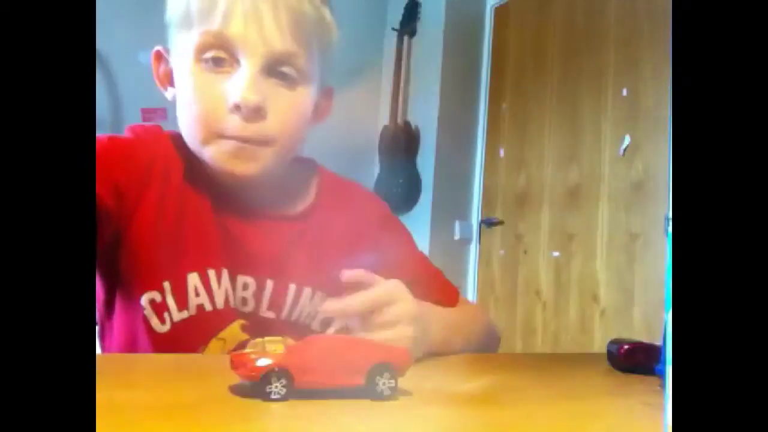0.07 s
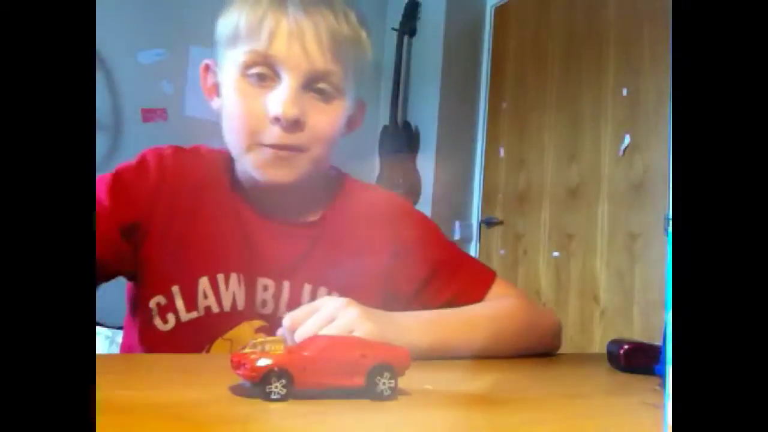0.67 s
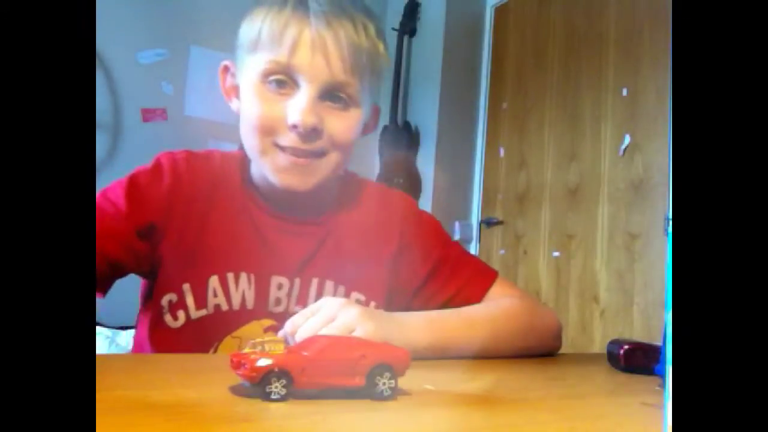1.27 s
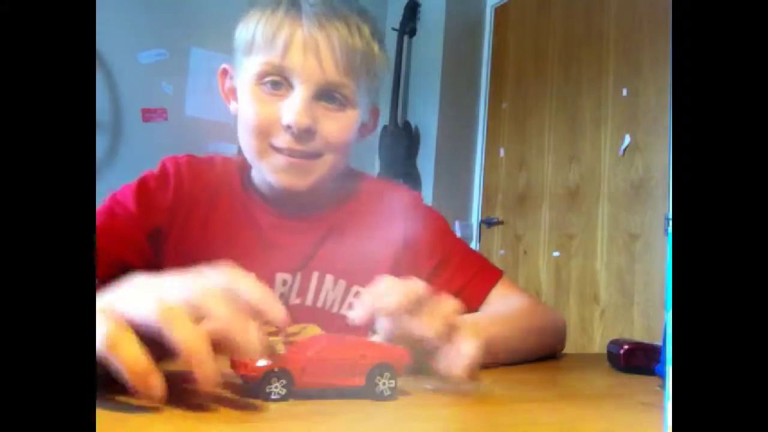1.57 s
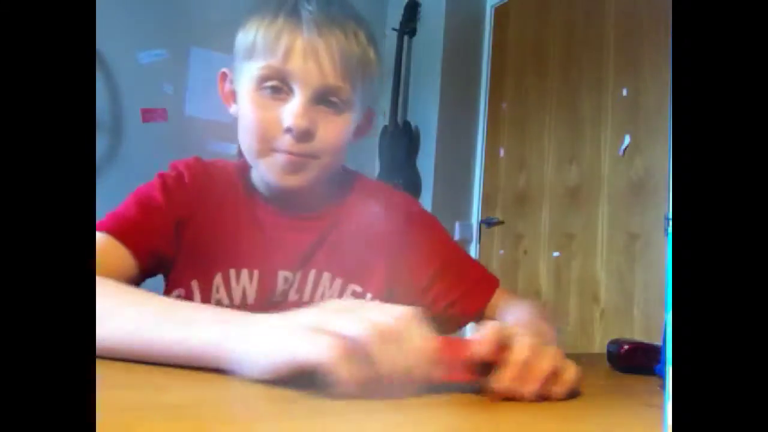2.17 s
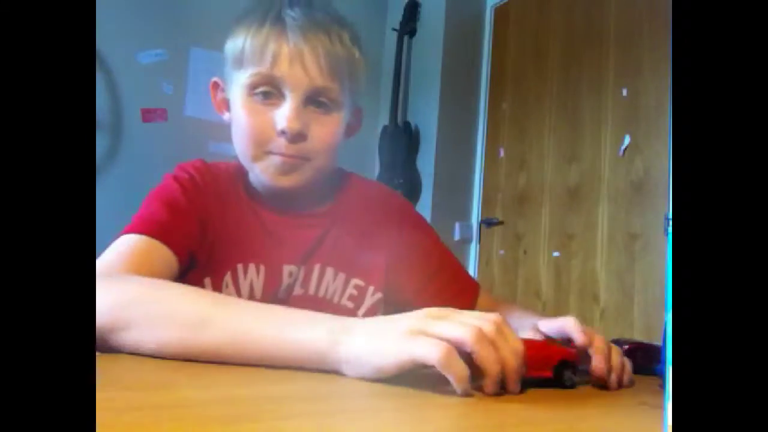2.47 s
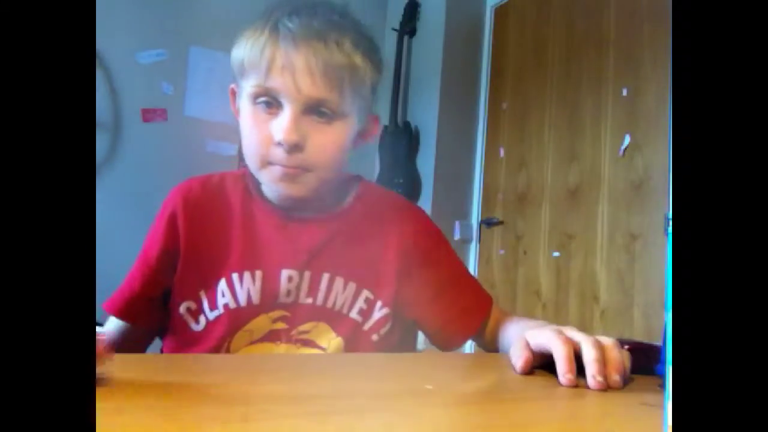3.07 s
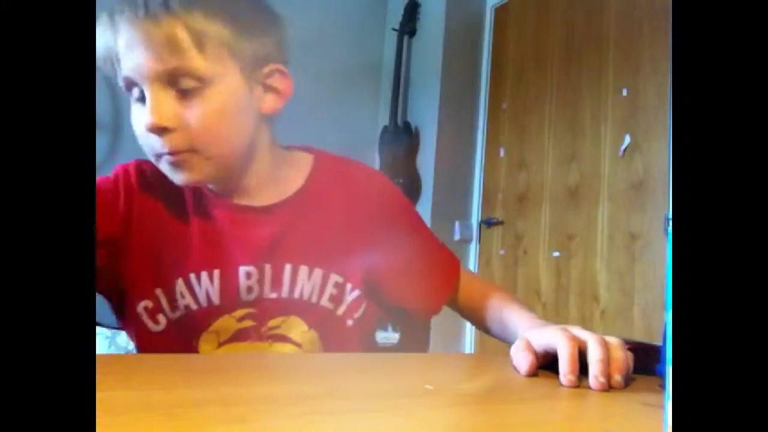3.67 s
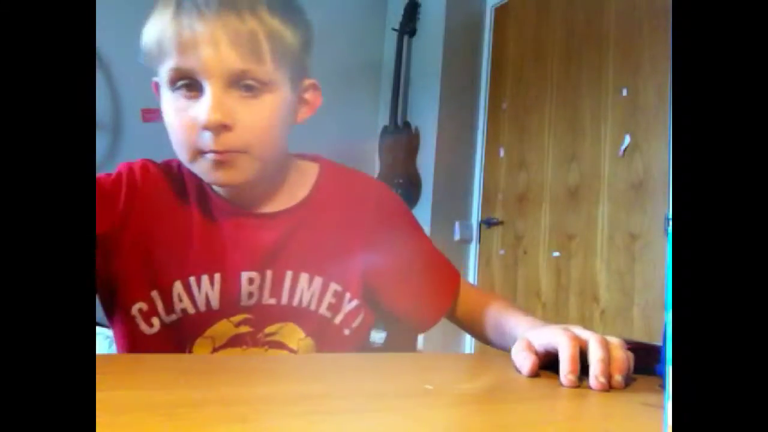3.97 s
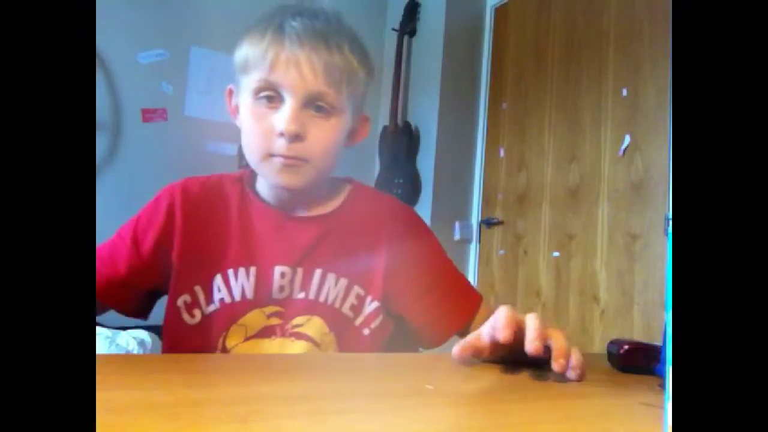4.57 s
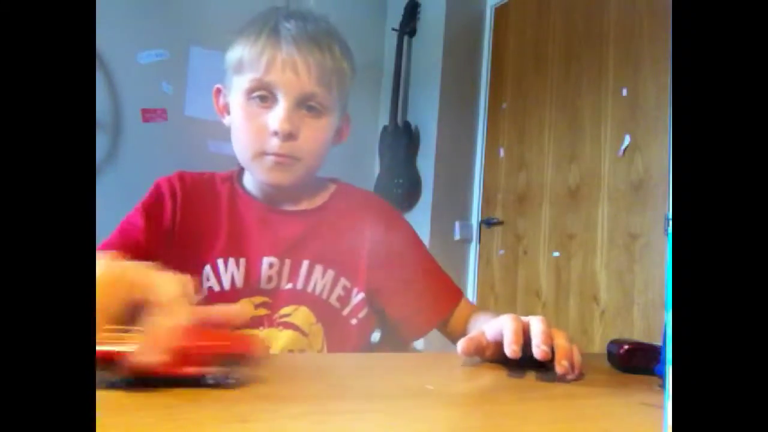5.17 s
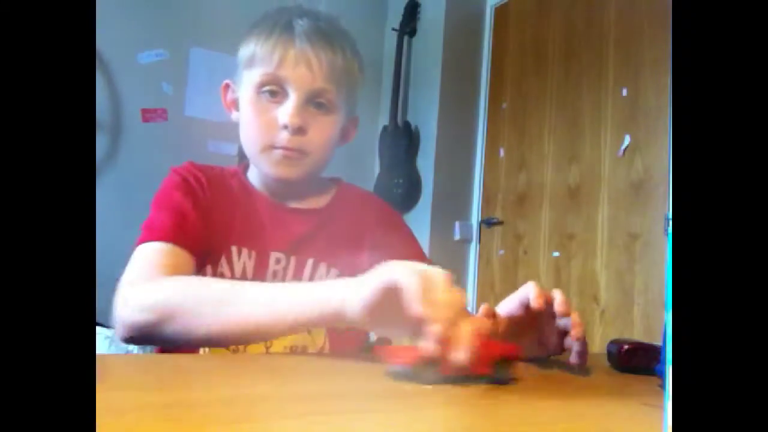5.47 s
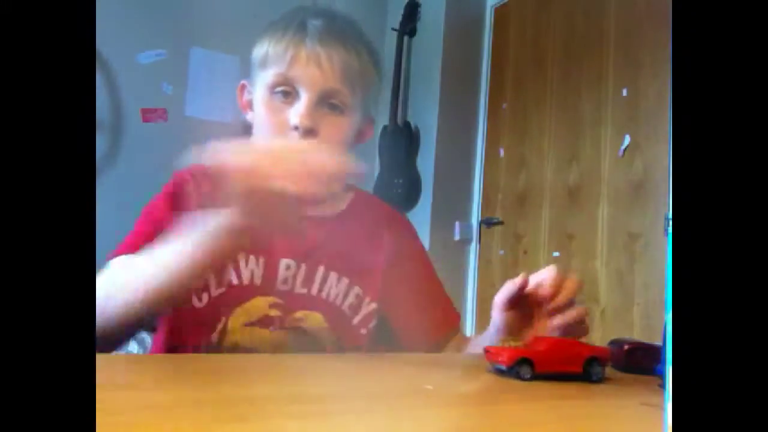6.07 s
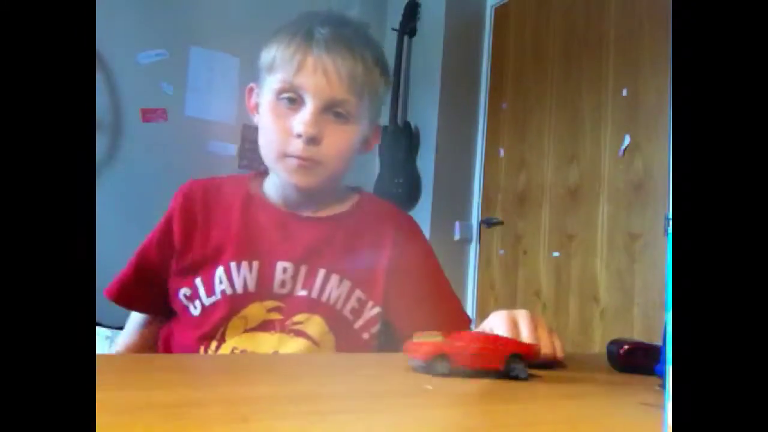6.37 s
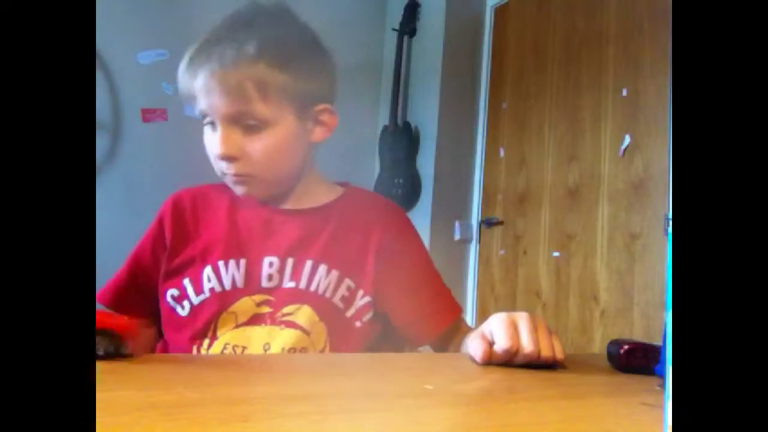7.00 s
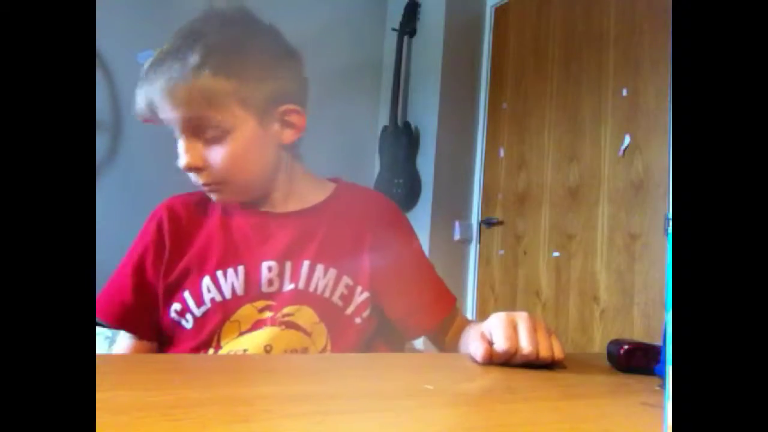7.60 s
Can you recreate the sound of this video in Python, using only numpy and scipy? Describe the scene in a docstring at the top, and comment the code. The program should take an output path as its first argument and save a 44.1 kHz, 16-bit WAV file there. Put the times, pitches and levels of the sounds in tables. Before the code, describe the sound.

A plastic pull-back toy car rattles over a wooden table, ratchets as it is wound, then rolls off and crashes to the floor.

```python
"""A small room with a wooden table, where a plastic pull-back toy car is pushed, wound back and let go.
Each contact is an impulse that excites damped modes: the wheels chatter, ringing the hollow shell and
the board, while hands rub and bump, gears whirr and the clutch of the fully wound spring ratchets.
On the last run the car shoots over the edge, hits the floor and bounces once."""
import sys
import numpy as np
from scipy import signal
from scipy.fft import rfft, irfft
from scipy.io import wavfile
from scipy.ndimage import uniform_filter1d

SR = 44100
rng = np.random.default_rng(int(sys.argv[2]) if len(sys.argv) > 2 else 0)


def pcm_store(signal):
    """Save signal as 16-bit PCM."""
    levels = np.round(np.clip(np.atleast_2d(signal), -1, 1) * 32767)
    wavfile.write(sys.argv[1], SR, levels.astype(np.int16).T)


N = 345744


def undb(db):
    """Logarithmic level: 20 dB is a factor of ten in amplitude."""
    return 10 ** (np.asarray(db) / 20)


def unit(x):
    """Normalisation to unit energy."""
    return x / np.sqrt(np.sum(x ** 2))


def convolve(x, response):
    """Convolution: a linear system answers every sample of x with its impulse response."""
    return signal.fftconvolve(x, response)[:N]


def colour(spectrum, size=4096):
    """Minimum phase: folding the cepstrum gives a causal response to a (f/Hz, level/dB) spectrum."""
    hz, db = np.transpose(spectrum)
    grid = np.maximum(np.fft.rfftfreq(size, 1 / SR), 1)
    magnitude = undb(np.interp(np.log(grid), np.log(hz), db))
    cepstrum = irfft(np.log(magnitude))
    cepstrum[1:size // 2] *= 2
    cepstrum[size // 2 + 1:] = 0
    return unit(irfft(np.exp(rfft(cepstrum))))


def noise(spectrum):
    """Spectral shaping: white noise takes on the given spectrum at unit power."""
    return convolve(rng.standard_normal(N), colour(spectrum))


def band(x, hz, width_hz):
    """Band-pass filtering: the part of x around hz, at unit power."""
    edges = [max(hz - width_hz / 2, 50), hz + width_hz / 2]
    sos = signal.butter(1, edges, "band", fs=SR, output="sos")
    passed = signal.sosfilt(sos, signal.sosfilt(sos, x))
    return passed / np.std(passed)


def drift(rate):
    """Random modulation: a glide between Gaussian values, rate of them a second."""
    step = int(SR / rate)
    held = np.repeat(rng.standard_normal(N // step + 1), step)
    return uniform_filter1d(held, step)[:N]


def swells(strokes):
    """Gaussian envelopes: each stroke rises and falls like a bell."""
    t = np.arange(N) / SR
    return sum(undb(db) * np.exp(-(2 * (t - middle) / length) ** 2) for middle, length, db in strokes)


def pulses(times, sizes):
    """Impulsive excitation: one sample for each contact."""
    return np.bincount(np.clip(times * SR, 0, N - 1).astype(int), sizes, N)


def fade(t60):
    """Exponential decay by 60 dB in t60 seconds, kept for half a second."""
    return np.exp(-np.log(1000) * np.arange(SR // 2) / SR / t60)


def ring(hz, t60, rise_cycles=0.62):
    """Damped oscillator: one mode of unit energy, swelling over its first cycle as the contact presses."""
    t = np.arange(SR // 2) / SR
    swell = 1 - np.exp(-(t * hz / rise_cycles) ** 2)
    return unit(swell * fade(t60) * np.sin(2 * np.pi * hz * t))


def strike(times, sizes, modes, scatter, centre_hz=None, focus_db=9):
    """Modal superposition: each contact lands at another spot and so weights the modes differently."""
    hz, width, db = np.transpose(modes)
    weights = undb(db) * (1 + scatter * rng.standard_normal((len(times), len(modes))))
    if centre_hz is not None:
        octaves_away = np.log2(hz / np.reshape(centre_hz, (-1, 1)))
        weights *= undb(-focus_db * octaves_away ** 2)
    weights *= (sizes / np.linalg.norm(weights, axis=1))[:, None]
    t60 = np.log(1000) / (np.pi * width)
    # neighbouring modes move in opposite senses
    return sum((-1) ** k * convolve(pulses(times, weights[:, k]), ring(hz[k], t60[k]))
               for k in range(len(modes)))


def bursts(times, sizes, spectrum, t60, rise_s=0.00074):
    """Modal overlap: a blow's dense modes merge into noise that builds as the parts chatter, then dies."""
    out = np.zeros(N + SR)
    envelope = fade(t60) * (1 - np.exp(-np.arange(SR // 2) / SR / rise_s))
    for start, size in zip((times * SR).astype(int), sizes):
        out[start:start + SR // 2] += size * unit(envelope * rng.standard_normal(SR // 2))
    return convolve(out, colour(spectrum))


# background spectrum: f/Hz, level/dB (levels in all tables are relative)
ROOM_SPECTRUM = [(25, -11), (70, -3), (130, -12), (260, -16), (450, -12), (800, -11.5), (1150, -7),
                 (1600, -12.5), (3000, -19), (8000, -25), (12000, -29), (15500, -38)]
def room_tone(level_db=-56):
    """Stationary noise: steady indoor murk and hiss."""
    return undb(level_db) * noise(ROOM_SPECTRUM)


# forearms shift on the table: middle t/s, length/s, level/dB
ARM_STROKES = [(.2, 0.35, -51), (.68, 0.43, -47), (1.05, 0.14, -48), (1.33, 0.28, -48.5),
               (3.9, 0.086, -40.5), (4.5, 1, -47), (5.87, 0.32, -42), (7.63, 0.21, -54.5)]
# spectrum of their rubbing: f/Hz, level/dB
RUB_SPECTRUM = [(40, -25), (90, -10), (130, 0), (170, -5), (270, -2), (450, -10), (800, -26), (3000, -70)]
def arm_rubs(gain_db=-3):
    """Friction noise: arms rub dully on the board."""
    return swells(ARM_STROKES) * undb(gain_db) * noise(RUB_SPECTRUM)


# modes of the table top: f/Hz, bandwidth/Hz, level/dB
TABLE_MODES = [(125, 24, 0), (141, 13, 2.5), (182, 14, -7), (221, 24, 2.5), (268, 16, -7), (322, 16, -6.5)]
# hands and forearms bump the table: t/s, level/dB, ring centre f/Hz
ARM_BUMPS = [(1.025, -31.5, 270), (1.32, -33, 140), (1.469, -23, 156), (1.506, -15.5, 133),
             (1.622, -11.5, 142), (2.385, -29, 405), (4.45, -25, 388), (4.657, -9, 133), (4.663, -13, 272)]
def arm_bumps(gain_db=17):
    """Contact time limits bandwidth: soft flesh pushes slowly, so only the table's low modes answer."""
    times, db, centre = np.transpose(ARM_BUMPS)
    return strike(times, undb(db + gain_db), TABLE_MODES, scatter=0.15, centre_hz=centre, focus_db=51)


# modes of the plastic shell, the chassis, and the gearbox with the enclosed air:
# f/Hz, bandwidth/Hz, level/dB
SHELL_MODES = [(1037, 130, 4), (1230, 160, -23), (1289, 200, 5.5), (1583, 324, 11.5), (1917, 96, 6),
               (2034, 150, 8.5), (2396, 250, 13)]
CHASSIS_MODES = [(2520, 790, -13.5), (2660, 92, -22), (2820, 210, -2), (3250, 290, -7.5), (3535, 58, -12),
                 (3904, 280, -6.5), (4640, 120, -16), (5230, 450, -14)]
GEARBOX_MODES = [(382.5, 30, 1), (437.6, 31, 8.5), (519, 17, 0.5), (591, 78, 6.5), (704, 45, 4),
                 (761, 15, -7.5)]
# spectrum of tyre hiss and chassis cracks: f/Hz, level/dB
GRIT_SPECTRUM = [(300, -13), (1500, -13), (2400, -18), (4000, 1.5), (5300, -16), (7000, -13), (10000, -24),
                 (15000, -45)]
# one curve per move (lined up, first run, picked up, drawn back, braked, run to the edge):
# t/s, chatter level/dB, rumble level/dB, shell ring centre f/Hz
MOVES = [
    [(1.46, -55, -58, 1400), (1.525, -41.5, -34, 1330), (1.654, -46, -34.5, 1440),
     (1.754, -44, -40.5, 1220), (1.812, -50, -43, 1490), (1.868, -46.5, -33, 1600),
     (1.91, -43.5, -40.5, 1210), (2.038, -34, -26, 1440), (2.244, -46, -35, 1400), (2.36, -58.5, -52, 1560)],
    [(2.37, -64, -59, 1520), (2.386, -52.5, -28.5, 1680), (2.476, -31, -26.5, 1510),
     (2.62, -28, -23.5, 1430), (2.79, -28.5, -26, 1620), (2.868, -33.5, -33, 1390),
     (2.93, -29, -25.5, 1590), (3.186, -36, -28, 1680), (3.252, -33, -27, 1860), (3.44, -35, -24.5, 1630),
     (3.594, -49.5, -32, 1720), (3.85, -65, -58, 1300)],
    [(3.96, -72, -47, 1550), (4.06, -43, -29, 1950), (4.11, -31, -28.5, 1740), (4.16, -44, -41, 1800),
     (4.24, -34.5, -34, 1730), (4.36, -71, -64, 1580)],
    [(4.655, -41, -37, 1980), (4.7, -43, -39, 1980), (4.76, -50.5, -39, 1970), (4.85, -37.5, -31.5, 2040),
     (4.94, -27, -23, 1800), (5.06, -35, -26.5, 1490)],
    [(5.06, -28, -28.5, 1380), (5.3, -51, -31, 1420), (5.63, -41, -43, 1456), (5.76, -56, -54, 1440)],
    [(5.98, -64, -35, 1530), (6.01, -56.5, -36, 1480), (6.284, -45, -34.5, 1450), (6.348, -35, -29.5, 1420),
     (6.504, -35.5, -30.5, 1430), (6.782, -33, -28, 1280), (6.93, -34.5, -25.5, 1180),
     (6.99, -34, -26.5, 1080), (7.03, -49, -34, 1400)],
]
# grip and load per move: chassis level/dB, gearbox level/dB, table level/dB, contact rate/Hz, spread/dB
LOADS = [(-4.5, -4.5, -4, 700, 3.2), (-8.5, -6.5, -3.5, 380, 3.5), (-4, -2, -4.5, 700, 3),
         (-5, 2, 2, 520, 2.5), (-10, 1, 1, 400, 6), (-9, -5, 0, 380, 3.5)]
def rolling(shell_db=5, gearbox_db=-2, hiss_db=-8, wander_octaves=0.35, swell_db=1.5, swell_hz=18):
    """Roughness excitation: tiny uneven impacts of wheels and gear teeth shake the car and the table."""
    contacts, hiss_gain = [], 0
    t = np.arange(N) / SR
    for move, (chassis, gearbox, table, rate, spread_db) in zip(MOVES, LOADS):
        knots, chatter, rumble, centre = np.transpose(move)
        times = np.arange(knots[0], knots[-1], 1 / rate)
        times = times + rng.uniform(-1, 1, len(times)) / rate
        sizes = undb(spread_db * np.minimum(rng.exponential(size=len(times)), 3.2))
        sizes *= np.sqrt(SR / rate / np.mean(sizes ** 2))  # unit power whatever the rate
        curves = centre, chatter, chatter + chassis, rumble + gearbox, rumble + table
        contacts.append([times, sizes] + [np.interp(times, knots, curve) for curve in curves])
        # tyres hiss in step with the rattle
        hiss_gain += undb(np.interp(t, knots, chatter + chassis + hiss_db, left=-np.inf, right=-np.inf))
    times, sizes, centre, shell, chassis, gearbox, table = np.hstack(contacts)
    # the load shifts between the wheels, so the chatter swells and sinks
    load = undb(swell_db * drift(swell_hz)[(times * SR).astype(int)])
    sizes = sizes * rng.choice([-1, 1], len(times)) * load
    centre = centre * 2 ** (wander_octaves * rng.standard_normal(len(times)))
    out = strike(times, sizes * undb(shell + shell_db), SHELL_MODES,
                 scatter=1, centre_hz=centre, focus_db=43)
    out += strike(times, sizes * undb(chassis), CHASSIS_MODES, scatter=6.2)
    out += strike(times, sizes * undb(gearbox + gearbox_db), GEARBOX_MODES, scatter=1)
    out += strike(times, sizes * undb(table), TABLE_MODES, scatter=0.78)
    return out + hiss_gain * noise(GRIT_SPECTRUM)


# spectrum of a snap on plastic: f/Hz, level/dB
SNAP_SPECTRUM = [(500, -67), (2000, 0), (3500, 1), (6000, -5.5), (7000, -9), (9300, -12), (11000, -18.5),
                 (15500, -30)]
# fingers grip or let go: start t/s, length/s, level/dB, ring centre f/Hz, nail click level/dB
FINGER_GRABS = [(1.503, 0.021, -12.5, 1500, -32), (1.557, 0.011, -14, 1390, -45),
                (1.579, 0.018, -6.5, 1130, -21), (1.633, 0.006, -15.5, 1700, -32),
                (1.673, 0.013, -11, 1300, -29), (1.827, 0.014, -19, 1700, -43),
                (1.855, .008, -12.5, 1450, -35), (4.019, 0.012, -21, 1750, -30),
                (5.805, 0.017, -15, 1400, -42), (5.99, .014, -16, 1480, -48)]
def finger_grabs(count=14, shell_db=10, gearbox_db=1, click_db=8, click_t60=0.051):
    """Sliding contact: fingertips skid over the plastic in a flurry of soft touches; a nail clicks."""
    start, length, db, centre, _ = np.repeat(FINGER_GRABS, count, axis=0).T
    times = start + length * rng.uniform(0, 1, len(start))
    sizes = undb(db) * rng.choice([-1, 1], len(start)) / np.sqrt(count)
    out = strike(times, sizes * undb(shell_db), SHELL_MODES, scatter=0.69, centre_hz=centre, focus_db=37)
    out += strike(times, sizes * undb(gearbox_db), GEARBOX_MODES, scatter=0.8)
    start, length, _, _, click = np.transpose(FINGER_GRABS)
    return out + bursts(start + length / 4, undb(click + click_db), SNAP_SPECTRUM, click_t60)


# palms slide over the table: middle t/s, length/s, level/dB
PALM_STROKES = [(2.06, 0.38, -51), (2.56, 0.43, -54)]
def palm_slides(gain_db=-3, band_hz=(4500, 10500)):
    """Friction noise: skin hisses faintly on the varnish."""
    treble = signal.butter(2, band_hz, "band", fs=SR, output="sos")
    hiss = signal.sosfilt(treble, rng.standard_normal(N))
    return swells(PALM_STROKES) * undb(gain_db) * hiss / np.std(hiss)


# the hand drives the gears, one curve per push: t/s, tooth f/Hz, hum level/dB, whine level/dB
GEAR_PUSHES = [
    [(1.92, 402.6, -56, -31), (2.01, 473.3, -50, -31), (2.04, 494, -48, -42), (2.12, 476.6, -48, -24),
     (2.165, 415, -54, -23), (2.23, 389, -29, -71)],
    [(3.36, 551, -33, -44), (3.475, 579.5, -48, -24), (3.54, 598, -42, -30.5), (3.62, 576, -48, -42)],
    [(4.02, 520.3, -36, -41), (4.06, 619, -34, -26.5), (4.09, 630, -30, -31.5), (4.112, 590, -27, -15.5),
     (4.14, 557, -39, -37), (4.16, 536, -46, -44)],
    [(4.7, 387.6, -21.5, -45), (4.77, 421.4, -46, -44), (4.829, 463, -21, -55), (4.875, 494.4, -34, -47),
     (4.9, 485.6, -21, -32), (4.96, 479.7, -38, -25), (5.09, 489.5, -34, -21), (5.3, 468.7, -42, -41),
     (5.66, 443.7, -44, -57)],
]
def gear_whirr(jitter=0.0598, uneven_db=3, hum_width_hz=300, whine_width_hz=520, hum_db=-1, whine_db=-2):
    """Gear-mesh harmonics: the enclosed air hums near the tooth rate, the shell near three times it."""
    out = np.zeros(N)
    for push in GEAR_PUSHES:
        knots, hz, hum, whine = np.transpose(push)
        span = np.arange(int(knots[0] * SR), int(knots[-1] * SR))
        t = span / SR
        teeth_passed = np.cumsum(np.interp(t, knots, hz)) / SR
        gap_error, force_error = rng.standard_normal((int(teeth_passed[-1]), 2)).T
        times = np.interp(np.cumsum(1 + jitter * gap_error), teeth_passed, t)
        teeth = pulses(times, undb(uneven_db * force_error))[span]
        mesh_hz = np.mean(hz)
        out[span] += band(teeth, mesh_hz, hum_width_hz) * undb(np.interp(t, knots, hum) + hum_db)
        whine_gain = undb(np.interp(t, knots, whine) + whine_db)
        out[span] += band(teeth, 3 * mesh_hz, whine_width_hz) * whine_gain
    return out


# wheels and loose axles knock against the shell: t/s, level/dB, ring centre f/Hz
AXLE_KNOCKS = [(1.954, -13.5, 1030), (1.999, -12, 1240), (2.095, -9.5, 1300), (2.447, -14, 1540),
               (2.487, -6.5, 1450), (2.543, -16, 1480), (2.576, -9.5, 1370), (2.604, -10.5, 1670),
               (2.612, -20, 1680), (2.662, -16, 1450), (2.673, -6.5, 1450), (2.699, -5.5, 1290),
               (2.716, -5, 1620), (2.739, -17, 1600), (2.754, -2, 1510), (2.795, -4, 1520),
               (2.82, -6.5, 1350), (2.837, -14, 1550), (2.875, -10.5, 1455), (2.897, -7, 1760),
               (2.913, -6, 1490), (2.933, -17, 1526), (2.953, -7.5, 1550), (2.988, -6, 1450),
               (3.004, -12.5, 1534), (3.02, -4, 1470), (3.057, -13, 1690), (3.131, -14.5, 1590),
               (3.162, -12.5, 1740), (3.176, -15.5, 1720), (3.238, -9.5, 1800), (3.263, -12.5, 2100),
               (3.277, -12, 1990), (3.357, -12.5, 1750), (3.47, -8, 1630), (3.553, -12, 1900),
               (3.61, -24, 2010), (3.906, -30, 1500), (3.958, -29.5, 1420), (3.991, -23, 1490),
               (4.057, -15.5, 1930), (4.171, -7, 1870), (4.19, -6.5, 1820), (4.661, -15, 1980),
               (4.687, -8, 1820), (4.882, -8, 1600), (4.902, -4.5, 1620), (4.913, -10, 1550),
               (4.943, -7, 1420), (4.96, -4.5, 1360), (5.002, -2, 1340), (5.02, -8, 1430),
               (6.106, -21.5, 1310), (6.169, -18, 1320), (6.222, -14.5, 1350), (6.306, -15.5, 1430),
               (6.338, -11.5, 1440), (6.393, -12, 1440), (6.468, -7.5, 1610), (6.551, -12.5, 1440),
               (6.588, -11, 1680), (6.635, -9, 1510), (6.692, -9, 1690), (6.753, -8.5, 2100),
               (6.767, -3, 1590), (6.792, -15, 1460), (6.8702, -7.5, 1420), (6.903, -3, 1180),
               (6.916, -3.5, 1480), (6.934, -3, 1370), (7.007, -12, 1310), (7.0165, -6.5, 1380)]
def axle_knocks(shell_db=12.5, crack_db=-6.5, crack_t60=0.046, bright_db_per_octave=18,
                graze_s=0.0037, graze_db=-14, rebound_s=0.0027, rebound_db=-3):
    """Impact across a clearance: an axle grazes, hits and rebounds; higher-ringing knocks are crisper."""
    times, db, centre = np.transpose(AXLE_KNOCKS)
    bright = bright_db_per_octave * np.log2(centre / np.mean(centre))
    rebounds = times + rebound_s * rng.uniform(0.715, 1.6, len(times))
    grazes = times - graze_s * rng.uniform(0.506, 1.5, len(times))
    hits = np.r_[grazes, times, rebounds]
    hit_db = np.r_[db + graze_db, db, db + rebound_db]
    out = strike(hits, undb(hit_db + shell_db), SHELL_MODES,
                 scatter=1, centre_hz=np.tile(centre, 3), focus_db=43)
    out += strike(hits, undb(hit_db + np.tile(bright, 3)), CHASSIS_MODES, scatter=1)
    out += strike(times, undb(db), GEARBOX_MODES, scatter=1)
    return out + bursts(times, undb(db + bright + crack_db), GRIT_SPECTRUM, crack_t60)


# modes of the axles and hubs: f/Hz, bandwidth/Hz, level/dB
AXLE_MODES = [(3160, 30, 0), (3290, 20, -9), (3460, 16, 6), (3520, 10, 5), (3580, 15, 4), (3640, 18, 0),
              (4430, 14, -4), (4667, 18, -1), (4560, 21, 15), (5002, 18, -1), (5110, 230, 8),
              (5370, 130, 2), (5968, 20, 7)]
# a loose metal axle touches its slot: t/s, level/dB
AXLE_PINGS = [(2.717, -31), (2.7545, -29), (2.8787, -22), (3.0948, -28), (3.1127, -21), (3.2055, -22),
              (3.2634, -30), (3.3207, -21), (3.341, -24), (3.4574, -21), (3.5527, -30), (3.6101, -20.5)]
def axle_pings(gain_db=10):
    """Free vibration: the axle's highest modes ring after a light metal touch."""
    times, db = np.transpose(AXLE_PINGS)
    return strike(times, undb(db + gain_db), AXLE_MODES, scatter=0.61, centre_hz=5250, focus_db=400)


# the spring loads the gear train: middle t/s, length/s, level/dB
GEAR_STRAINS = [(3.3, 0.72, -50.5), (4.98, 0.31, -40.5)]
# spectrum of a tooth's tick: f/Hz, level/dB
TICK_SPECTRUM = [(800, -23), (2500, -1), (4000, 2), (5100, -2), (6500, -3), (10000, -15), (15000, -30)]
def gear_crackle(rate=110, spread_db=4, t60=0.014):
    """Shot noise: loaded teeth tick against each other at random instants, small and bright."""
    times = rng.uniform(0, N / SR, int(rate * N / SR))
    sizes = undb(spread_db * np.minimum(rng.exponential(size=len(times)), 3))
    envelope = convolve(pulses(times, sizes), fade(t60))
    ticks = convolve(envelope * rng.standard_normal(N), colour(TICK_SPECTRUM))
    return ticks / np.std(ticks) * swells(GEAR_STRAINS)


# the wheels drop on the board or off its edge: t/s, level/dB, relative snap level/dB
WHEEL_DROPS = [(4.66, -10, 7), (4.687, -7.5, -17), (6.74, -4, -32), (7.016, -2.5, -8)]
def wheel_drops(thump_db=8, snap_t60=0.046):
    """Action and reaction: each drop snaps and draws a hollow thump from both board and car."""
    times, db, snap = np.transpose(WHEEL_DROPS)
    sizes = undb(db + thump_db)
    out = strike(times, sizes, TABLE_MODES, scatter=0.14, centre_hz=240, focus_db=13)
    out += strike(times, sizes, GEARBOX_MODES, scatter=0.3)
    return out + bursts(times, undb(db + snap), SNAP_SPECTRUM, snap_t60)


# the tyres scrub on the board: middle t/s, length/s, level/dB
TYRE_SKIDS = [(4.735, 0.035, -41), (4.83, .06, -41), (4.9, .05, -39)]
def tyre_skids(rate=900, gain_db=24):
    """Stick-slip friction: the pressed tyres jerk as the car starts, ringing the shell's upper modes."""
    times = rng.uniform(0, (N - 1) / SR, int(rate * N / SR))
    envelope = swells(TYRE_SKIDS)[(times * SR).astype(int)]
    sizes = rng.standard_normal(len(times)) * envelope * undb(gain_db)
    return strike(times, sizes, SHELL_MODES, scatter=0.58, centre_hz=2250, focus_db=120)


# the clutch slips tooth by tooth, slowing as the hand brakes: t/s, snap level/dB, shell level/dB
CLUTCH_TEETH = [(5.063, -19.5, -12), (5.082, -25, -16), (5.1051, -24, -14.5), (5.1203, -29, -23),
                (5.1403, -25.5, -14.5), (5.162, -23, -14), (5.185, -24.5, -21), (5.2087, -24.5, -14),
                (5.2233, -31, -19), (5.2397, -25.5, -11), (5.2608, -25, -21), (5.289, -26.5, -19),
                (5.3168, -21, -15), (5.3282, -33, -18.5), (5.3487, -24.5, -16.5), (5.3794, -23, -14),
                (5.4201, -27.5, -18), (5.445, -25.5, -17.5), (5.4838, -28, -13.5), (5.5252, -22.5, -17),
                (5.5718, -24, -19.5), (5.624, -23.5, -15)]
def pawl_scrapes(count=9, lead_s=0.012, gain_db=-1, grit_t60=0.012):
    """Stick-slip friction: before each snap the pawl climbs the ramp of the tooth in tiny slips."""
    snap_times, snap, shell = np.repeat(CLUTCH_TEETH, count, axis=0).T
    times = snap_times - lead_s * rng.exponential(size=len(snap_times))
    sizes = undb(gain_db) * rng.standard_normal(len(times))
    out = strike(times, sizes * undb(shell), SHELL_MODES, scatter=1, centre_hz=1550, focus_db=37)
    out += strike(times, sizes * undb(snap), CHASSIS_MODES, scatter=1)
    return out + bursts(times, sizes * undb(snap), SNAP_SPECTRUM, grit_t60)


# modes of the hollow body, clamped by the wound spring: f/Hz, bandwidth/Hz, level/dB
BODY_MODES = [(464.5, 23.9, -5.5), (1338, 50, 3), (1465, 24, 0), (1820, 42, -13), (2310, 28.6, -14)]
def ratchet(shell_db=20, gearbox_db=11, body_db=20, snap_db=23.5, snap_t60=0.017,
            seat_s=0.003, seat_db=-4, rattle_count=4, rattle_s=0.015, rattle_db=-18):
    """Elastic release: the pawl snaps off a tooth and seats on the next; the body rings, axles rattle."""
    times, snap, shell = np.transpose(CLUTCH_TEETH)
    seated = times + seat_s * rng.uniform(0.503, 2.0, len(times))
    rattles = (times + rattle_s * rng.uniform(0.201, 1, (rattle_count, len(times)))).ravel()
    hits = np.r_[times, seated, rattles]
    hit_db = np.r_[shell, shell + seat_db, np.tile(shell, rattle_count) + rattle_db]
    out = strike(hits, undb(hit_db + shell_db), SHELL_MODES, scatter=1, centre_hz=1430, focus_db=62)
    out += strike(hits, undb(hit_db + gearbox_db), GEARBOX_MODES, scatter=0.47)
    out += strike(times, undb(shell + body_db), BODY_MODES, scatter=0.54)
    snap_sizes = undb(np.r_[snap, snap + seat_db] + snap_db)
    return out + bursts(np.r_[times, seated], snap_sizes, SNAP_SPECTRUM, snap_t60, rise_s=0.0012)


# spectra of the middle, bass and treble of a blow on the floor: f/Hz, level/dB
CRASH_SPECTRUM = [(300, -48), (900, -17.5), (1600, -13.5), (2500, -13), (3600, -13), (4900, -15.5),
                  (6000, -23), (9000, -38), (15000, -54)]
THUD_SPECTRUM = [(40, -72), (90, -20), (150, -12), (260, -11), (420, -7), (650, -19), (900, -34),
                 (2000, -53)]
SPLINTER_SPECTRUM = [(2000, -15), (3500, -22), (6000, 2), (7600, 1), (10000, -7), (13000, -16),
                     (15500, -36)]
# modes of the floor: f/Hz, level/dB, T60/s
FLOOR_MODES = [(249.6, 11.5, 0.18), (408, 11.5, 0.13), (461, 7, 0.11), (675, 3, 0.079), (1427, 7.5, 0.18),
               (1617, 6, 0.13)]
# the car lands and tumbles: t/s, level/dB, relative level/dB of thud, splinter, crack and axle ring,
# axle ring centre f/Hz
FLOOR_HITS = [(7.360, -3, 1, -15, -6, -17, 4700), (7.369, -6, 5.5, 4.5, 3.5, -1, 4200),
              (7.722, -13, 3.5, -5, -11, -15, 3600), (7.730, -8.5, -6, 9, -1, -6, 3500),
              (7.744, -9.5, 0, 6.5, 2, 6, 3400), (7.767, -24, 3, 0, -4, 10, 3400)]
def floor_crash(crash_db=17, crack_db=12, thud_db=15, splinter_db=6, axle_db=14, floor_db=14):
    """Hard impact is broadband: plastic cracks, axles and floor ring, in a wash of reflections."""
    times, db, thud, splinter, crack, axle, centre = np.transpose(FLOOR_HITS)
    out = bursts(times, undb(db + crash_db), CRASH_SPECTRUM, t60=0.28)
    out += bursts(times, undb(db + crack + crack_db), CRASH_SPECTRUM, t60=0.078)
    out += bursts(times, undb(db + thud + thud_db), THUD_SPECTRUM, t60=0.24)
    out += bursts(times, undb(db + splinter + splinter_db), SPLINTER_SPECTRUM, t60=0.23)
    out += strike(times, undb(db + axle + axle_db), AXLE_MODES,
                  scatter=0.32, centre_hz=centre, focus_db=27)
    floor = unit(sum(undb(mode_db) * ring(hz, t60) for hz, mode_db, t60 in FLOOR_MODES))
    return out + convolve(pulses(times, undb(db + floor_db)), floor)


def room(x, wet_db=-6, t60=0.21, rise_s=0.00094, band_hz=(450, 10000), patterns=6, shift_hz=5):
    """Reverberation: near walls answer within milliseconds; the echoes shift as car and arms move."""
    build_up = 1 - np.exp(-(np.arange(SR // 2) / SR / rise_s) ** 2)
    envelope = build_up * fade(t60)
    shares = np.array([drift(shift_hz) for _ in range(patterns)])
    shares /= np.linalg.norm(shares, axis=0)  # constant total power
    echoes = sum(convolve(x * share, unit(envelope * rng.standard_normal(SR // 2))) for share in shares)
    walls = signal.butter(2, band_hz, "band", fs=SR, output="sos")
    return x + undb(wet_db) * signal.sosfilt(walls, echoes)


def scene():
    """Superposition: the sounds on the table with their echoes, the crash and the background add."""
    wheels = rolling() + axle_knocks() + axle_pings() + wheel_drops() + tyre_skids()
    motor = gear_crackle() + gear_whirr() + ratchet() + pawl_scrapes()
    hands = finger_grabs() + arm_bumps() + arm_rubs() + palm_slides()
    return (room(wheels + motor + hands) + floor_crash() + room_tone())[None]


def record(dry, bass_hz=70, top_hz=15700):
    """Band limiting and saturation: a small microphone thins the bass and rounds peaks; the top is cut."""
    high_pass = signal.butter(1, bass_hz, "high", fs=SR, output="sos")
    low_pass = signal.ellip(8, 0.2, 70, top_hz, fs=SR, output="sos")
    rounded = np.tanh(signal.sosfilt(high_pass, dry))
    return signal.sosfilt(low_pass, rounded)


dry = scene()
out = record(dry)
pcm_store(out)
```